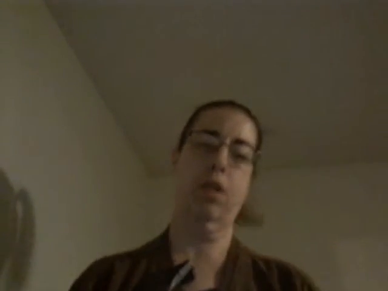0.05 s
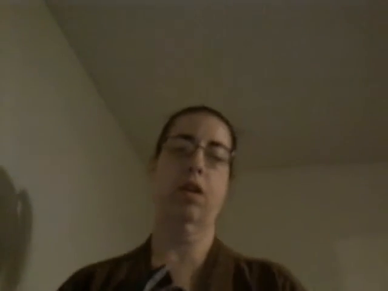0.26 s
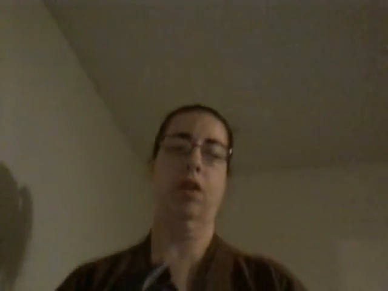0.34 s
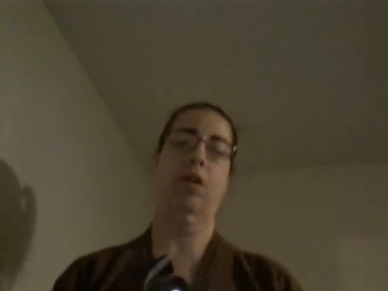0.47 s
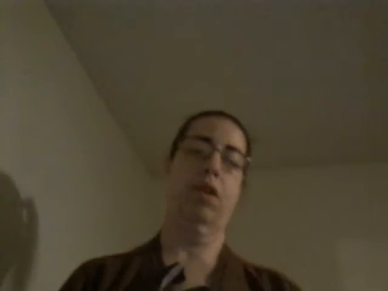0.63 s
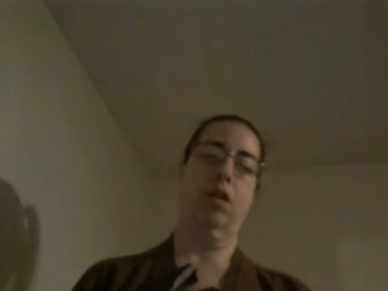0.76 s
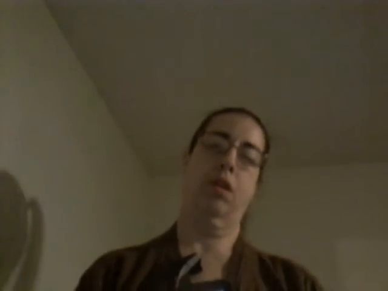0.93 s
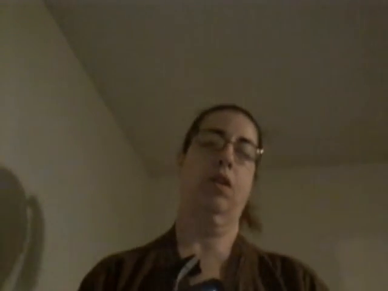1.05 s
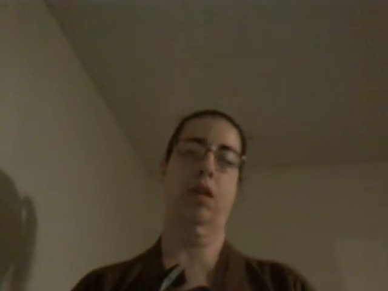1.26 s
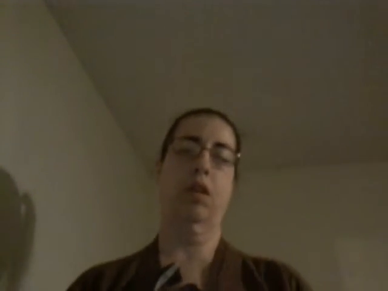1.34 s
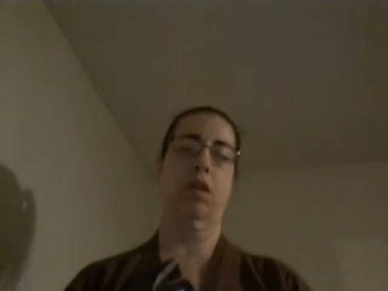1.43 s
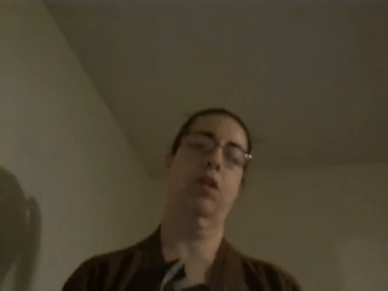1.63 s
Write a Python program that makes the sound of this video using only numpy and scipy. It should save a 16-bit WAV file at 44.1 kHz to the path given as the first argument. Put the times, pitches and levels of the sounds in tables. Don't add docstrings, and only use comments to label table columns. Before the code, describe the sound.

Someone walks on a treadmill in a small room; three hollow, scuffing steps about half a second apart, the first loudest and squeaky, above constant fan wash and a wavering motor whine, close single microphone.

```python
import sys
import numpy as np
from scipy import signal
from scipy.fft import rfft, irfft
from scipy.io import wavfile
from scipy.ndimage import uniform_filter1d

SR = 44100
rng = np.random.default_rng(int(sys.argv[2]) if len(sys.argv) > 2 else 0)


def unload_wav(signal):
    wavfile.write(
        sys.argv[1],
        SR,
        np.round(np.clip(np.atleast_2d(signal).T, -1, 1) * 32767).astype(np.int16),
    )


def voltage_ratio(level):
    return 10 ** (np.asarray(level, float) / 20)


N = 77175
STEP_SAMPLES = 8000

# time in seconds, pitch in Hz, level in dB.
MOTOR_WHINE = [(0, 374, -42), (0.122, 378, -41.5), (.24, 406, -37.5), (.3, 412, -55), (0.361, 400, -39.5),
               (.472, 352, -45), (.55, 352, -36.5), (.645, 360, -57), (.68, 366, -43.5), (.8, 395, -36),
               (.85, 405, -47.5), (.91, 393, -40), (1.032, 362, -45.5), (1.332, 410, -38), (1.39, 412, -59),
               (1.451, 398, -38), (1.601, 354, -50), (1.75, 378, -43.5)]
# frequency in Hz, density in dB per Hz.
WASH_SPECTRUM = [(30, -9), (110, -14), (180, 1.5), (330, -0.5), (620, -8), (2900, -22), (7000, -15),
                 (14800, -30.5)]
# start in seconds, level in dB, length in seconds, tilt in dB per octave.
SCUFFS = [(0.118, -41.5, 0.043, 0), (0.208, -46.5, 0.049, -2), (0.263, -33.5, 0.044, -3.5),
          (0.328, -51, 0.06, 6), (0.744, -48, 0.09, 0), (0.818, -31, 0.028, -2.5),
          (1.191, -43.5, 0.017, 1.5), (1.267, -51, 0.071, -2), (1.225, -43.5, 0.054, -9),
          (1.344, -38, .03, -2), (1.362, -34, 0.043, -6.9)]
# frequency in Hz, density in dB per Hz.
RUB_SPECTRUM = [(600, -24.5), (1500, -13), (3000, -7), (4500, -7.5), (6800, -2.5), (9000, -7.5),
                (12000, -17), (15000, -26.5)]
# start in seconds, level in dB, pitch in Hz, 60 dB decay in seconds.
KNOCKS = [
    (0.189, -46, 1050, 0.13),
    (.658, -43, 970, 0.1),
    (1.050, -58, 583, 0.037),
    (1.556, -46, 620, 0.077),
    (1.736, -44, 970, .1),
    (.312, -23, 6640, 0.025),
    (1.399, -25.5, 6700, 0.023),
]
# start in seconds, level in dB, length in seconds, slap level in dB.
THUDS = [(.228, -22, 0.033, -20.5), (0.264, -23, 0.023, -12), (.295, -30.5, 0.037, -12),
         (.340, -37, 0.02, -11.5), (.748, -35.5, 0.011, -15), (.790, -29, 0.022, -13.5),
         (.830, -36.5, 0.061, -10), (.900, -46, 0.032, -21), (1.285, -31.5, 0.037, -12),
         (1.314, -31, 0.016, -15.5), (1.385, -33.5, 0.028, -15), (1.350, -35.5, 0.012, -3.5),
         (1.420, -41, .02, -23)]
# frequency in Hz, width in Hz, level in dB.
DECK_MODES = [(177.5, 33.7, 1), (239.3, 46, -3), (292.4, 37, 0), (470.4, 97, -9), (565.4, 141, -11)]
# start in seconds, level in dB, length in seconds, slip rate in Hz, jitter 0-1.
SQUEAKS = [
    (0.264, -29, 0.011, 2584, 0.07),
    (0.275, -12, 0.0076, 2562, 0.01),
    (0.285, -18.5, 0.0023, 2614, 0),
    (0.294, -21.5, 0.01, 2631, 0.02),
    (0.814, -21, .028, 537, 0.02),
    (1.345, -39, 0.017, 494, 0.05),
    (1.364, -32.5, 0.023, 567, 0.03),
    (1.39, -41.5, 0.02, 541, 0),
]
# frequency in Hz, level in dB.
SOLE_SPECTRUM = [(1610, -6), (2170, -1), (2560, -8.5), (2700, -21), (3240, -20.5), (3770, -13),
                 (5200, -25.5), (7700, -35)]
# frequency in Hz, 60 dB decay in seconds.
ROOM_DECAY = [(150, 0.25), (600, 0.33), (1600, 0.37), (2200, 0.19), (2600, 0.25), (5000, 0.27),
              (12000, 0.12)]


def evened(x):
    return x / np.sqrt(np.mean(x ** 2) + 1e-20)


def read(points, hz):
    f, value = np.transpose(points)
    return np.interp(np.log(hz + 1), np.log(f + 1), value)


def add(mix, start_s, sound):
    part = mix[round(start_s * SR):][:len(sound)]
    part += sound[:len(part)]


def slow(size, top_hz):
    t = np.arange(size) / SR
    rates = np.geomspace(top_hz / 8, top_hz, 12)
    return sum(np.sin(2 * np.pi * (f * t + rng.random())) for f in rates) / np.sqrt(6)


def resonate(x, hz, width_hz):
    r = np.exp(-np.pi * width_hz / SR)
    poles = [1, -2 * r * np.cos(2 * np.pi * hz / SR), r * r]
    once = signal.lfilter([1, -1], poles, x)
    return evened(signal.lfilter([1, -1], poles, once))


def stroke(length_s, rise_s, fall_s):
    t = np.arange(STEP_SAMPLES) / SR
    rise = np.sin(np.pi / 2 * np.minimum(t / rise_s, 1)) ** 2
    return rise * np.exp(-np.maximum(t - length_s, 0) / fall_s)


def motor():
    wobble_hz, wobble_db = 1.13, 1.5
    t = np.arange(N) / SR
    s, hz, db = np.transpose(MOTOR_WHINE)
    pitch = uniform_filter1d(np.interp(t, s, hz), size=1500) + wobble_hz * slow(N, 60)
    level = voltage_ratio(np.interp(t, s, db) + wobble_db * slow(N, 50))
    return np.sqrt(2) * level * np.sin(2 * np.pi * np.cumsum(pitch) / SR)


def wash():
    level_db, patch_db = -47.5, 1.5
    frames, hz = N // 256 + 5, np.fft.rfftfreq(1024, 1 / SR)
    a, b, patches = rng.standard_normal((frames, 513, 3)).T
    patches = uniform_filter1d(patches, size=12, axis=0)
    patches = evened(uniform_filter1d(patches, size=10, axis=1))
    gain = voltage_ratio(read(WASH_SPECTRUM, hz)[:, None] + patch_db * patches)
    x = signal.istft((a + 1j * b) * gain, nperseg=1024, noverlap=768)[1][:N]
    return voltage_ratio(level_db) * evened(x)


def scuff(level_db, length_s, tilt_db):
    hz = np.fft.rfftfreq(STEP_SAMPLES, 1 / SR)
    grit = rng.standard_normal(STEP_SAMPLES) * voltage_ratio(0.83 * slow(STEP_SAMPLES, 279))
    colour = voltage_ratio(read(RUB_SPECTRUM, hz) + tilt_db * np.log2(hz / 5000 + 0.012))
    rub = evened(irfft(rfft(grit) * colour))
    return voltage_ratio(level_db) * stroke(length_s, 0.0052, 0.022) * rub


def knock(level_db, hz, t60_s):
    t = np.arange(STEP_SAMPLES) / SR
    ring = resonate(rng.standard_normal(STEP_SAMPLES), hz, 22 * np.sqrt(hz))
    rise = np.minimum(t / 0.001, 1)
    return voltage_ratio(level_db - 60 * t / t60_s) * rise * ring


def thud(level_db, length_s, slap_db):
    push = rng.standard_normal(STEP_SAMPLES) * voltage_ratio(1.95 * slow(STEP_SAMPLES, 90))
    body = sum(voltage_ratio(db) * resonate(push, hz, width_hz) for hz, width_hz, db in DECK_MODES)
    slap = voltage_ratio(slap_db) * resonate(push, hz=620, width_hz=795)
    return voltage_ratio(level_db) * stroke(length_s, 0.0033, 0.022) * (evened(body) + slap)


def squeak(level_db, length_s, slip_hz, jitter):
    t = np.arange(STEP_SAMPLES) / SR
    glide = 0.0046 * (np.minimum(t / length_s, 1.5) - 0.5)
    rate = slip_hz * (1 + glide + jitter * slow(STEP_SAMPLES, 186))
    turns = np.cumsum(rate) / SR
    k = np.arange(1, 15)[:, None]
    hz = k * slip_hz
    low_loss_db = 28 * np.maximum(np.log2(1600 / hz), 0)
    gain = voltage_ratio(read(SOLE_SPECTRUM, hz) - low_loss_db) * (hz < SR / 5)
    tone = (gain * np.cos(2 * np.pi * (k * turns + rng.random(k.shape)))).sum(axis=0)
    level = voltage_ratio(level_db + 0.58 * slow(STEP_SAMPLES, 246))
    return level * stroke(length_s, 0.39 * length_s, 0.0038) * evened(tone)


def room(x):
    taps = np.zeros(SR // 2)
    at = np.arange(200, SR // 2 - 20, 20)
    taps[at + rng.integers(0, 20, len(at))] = rng.choice([-1., 1.], len(at))
    hz, t, z = signal.stft(taps, SR, nperseg=256)
    decay = voltage_ratio(-60 * t / read(ROOM_DECAY, hz)[:, None])
    tail = signal.istft(z * decay, SR, nperseg=256)[1]
    return signal.fftconvolve(x, tail / np.linalg.norm(tail))[:N]


def scene():
    steps = np.zeros(N)
    for source, table in ((scuff, SCUFFS), (knock, KNOCKS), (thud, THUDS), (squeak, SQUEAKS)):
        for start_s, *settings in table:
            add(steps, start_s, source(*settings))
    steps = signal.sosfilt(signal.butter(6, 136, "high", fs=SR, output="sos"), steps)
    room_db = -7.5
    mono = steps + voltage_ratio(room_db) * room(steps) + motor() + wash()
    return np.array([mono, mono])


def low_pass(x):
    return signal.sosfilt(signal.butter(12, 14900, fs=SR, output="sos"), x)


def record(dry):
    x = signal.sosfilt(signal.butter(2, 51.5, "high", fs=SR, output="sos"), dry)
    band_limit = signal.firwin(511, 14900, window=("kaiser", 9), fs=SR)
    x = signal.oaconvolve(x, band_limit[None], "same")
    return low_pass(x)


dry = scene()
out = record(dry)
unload_wav(out)
```